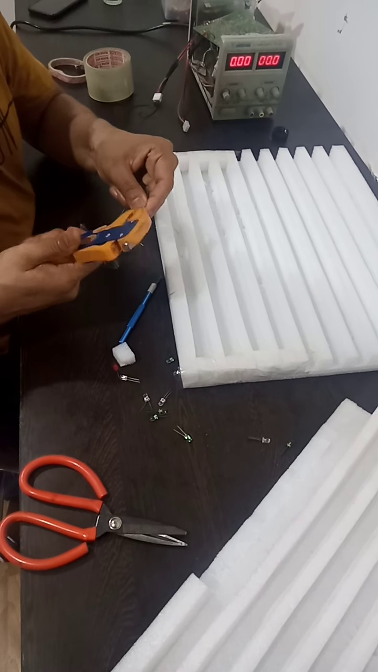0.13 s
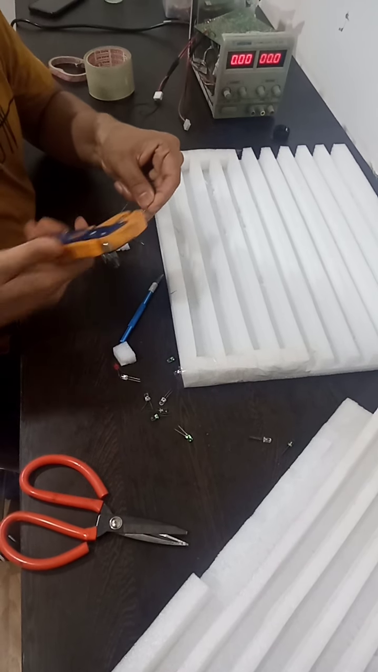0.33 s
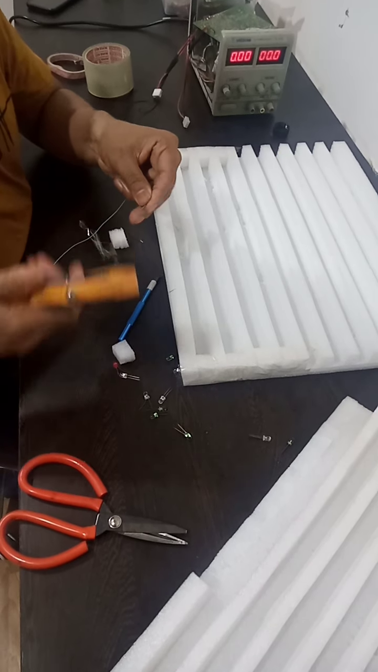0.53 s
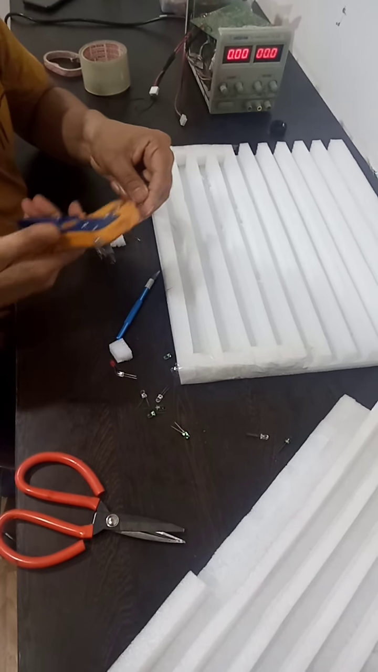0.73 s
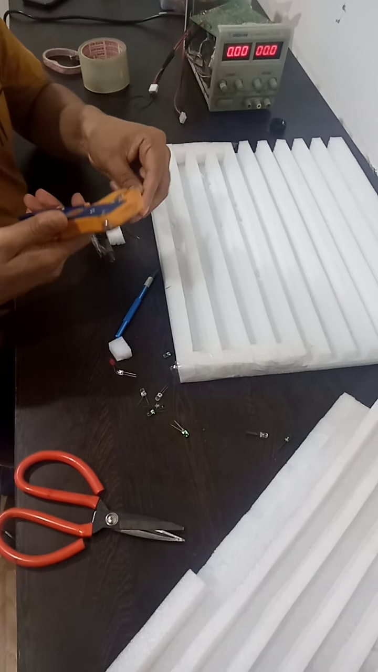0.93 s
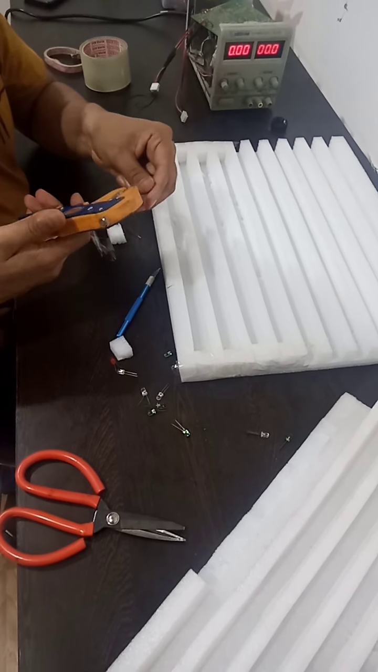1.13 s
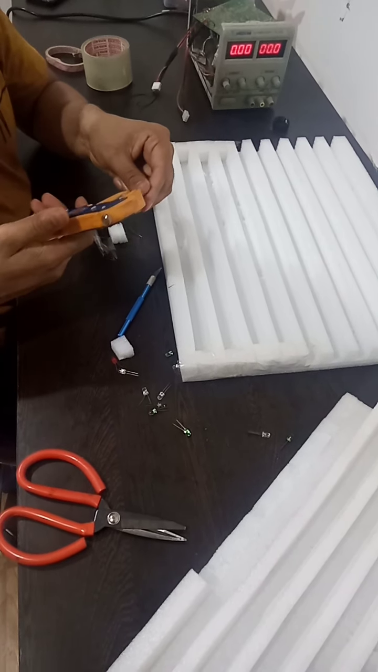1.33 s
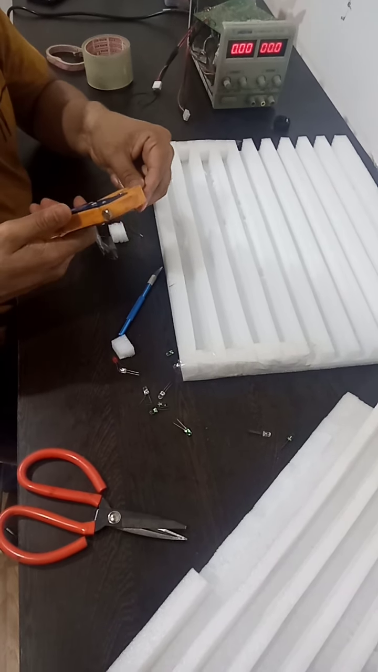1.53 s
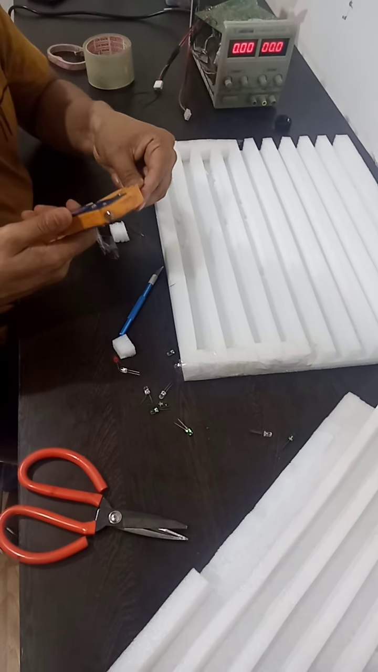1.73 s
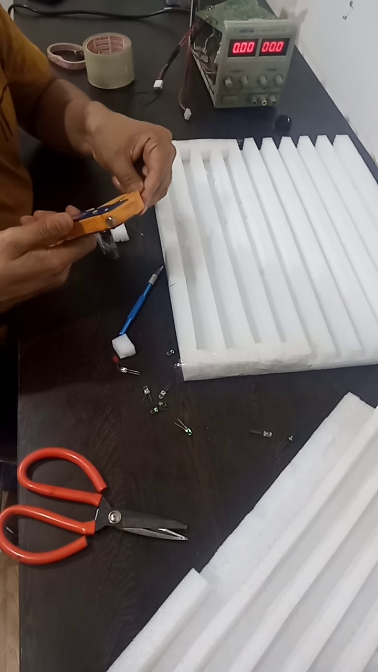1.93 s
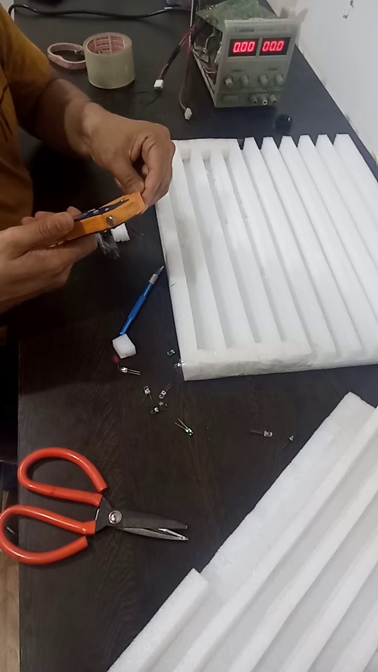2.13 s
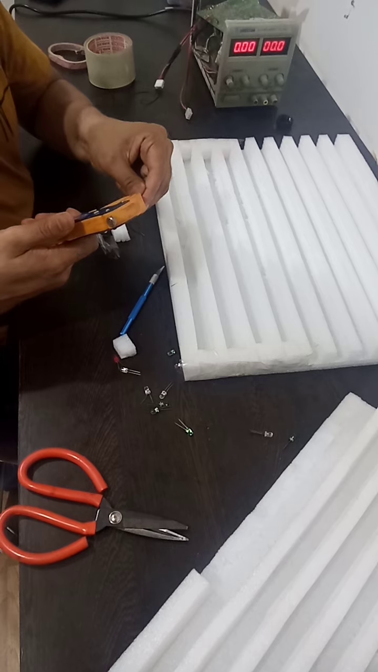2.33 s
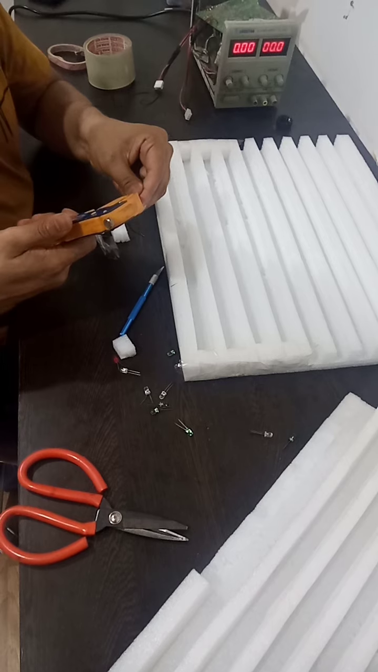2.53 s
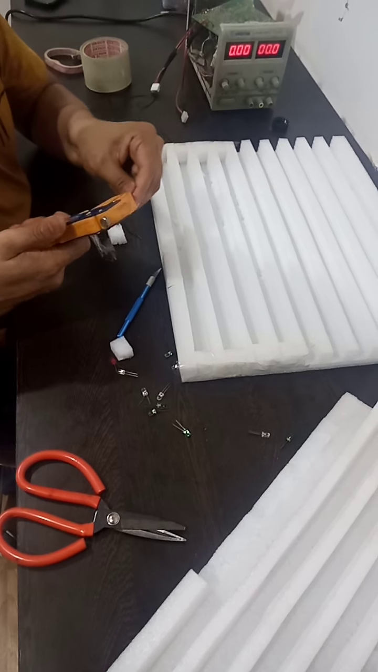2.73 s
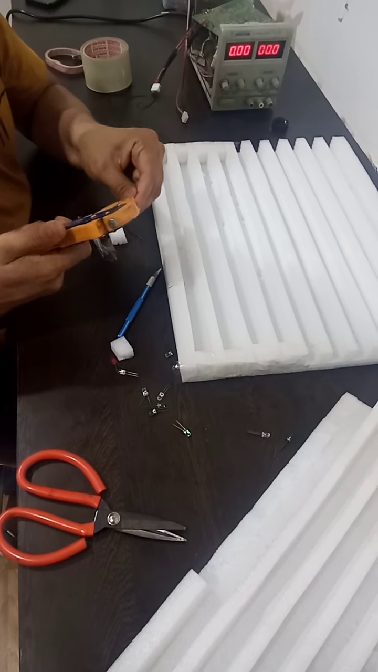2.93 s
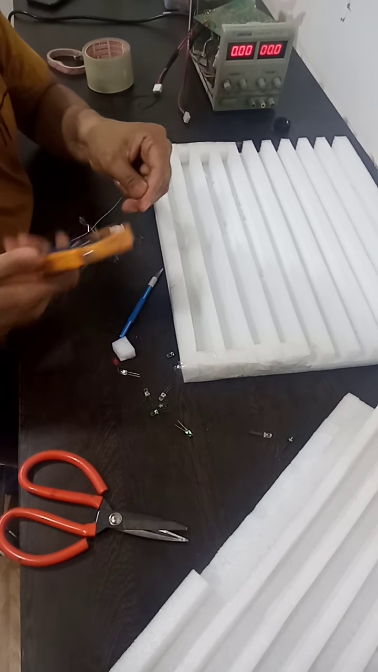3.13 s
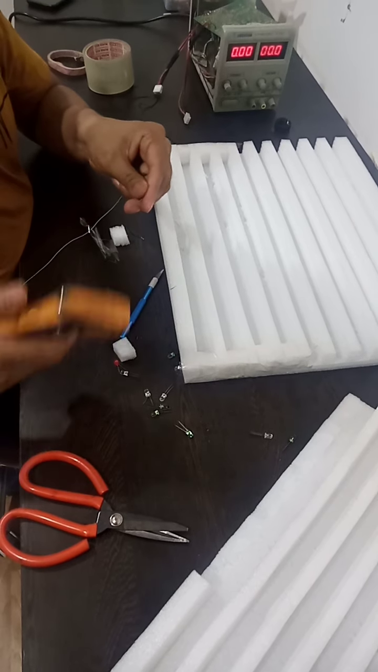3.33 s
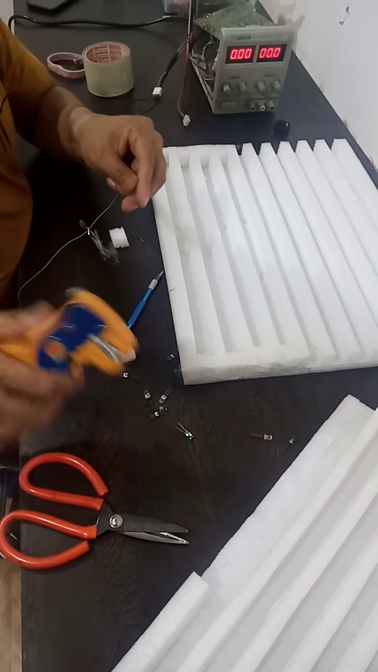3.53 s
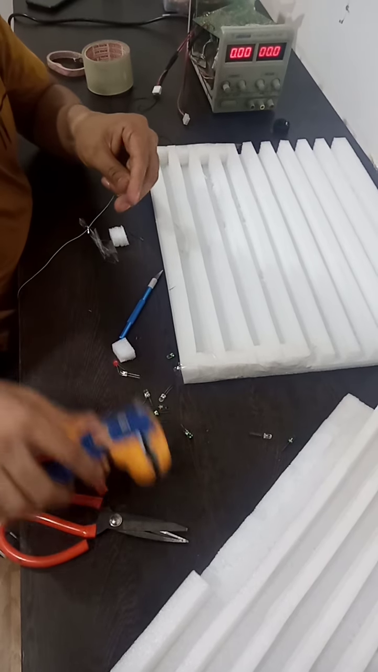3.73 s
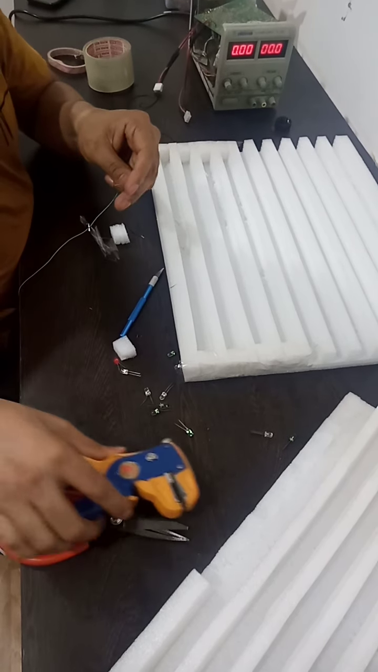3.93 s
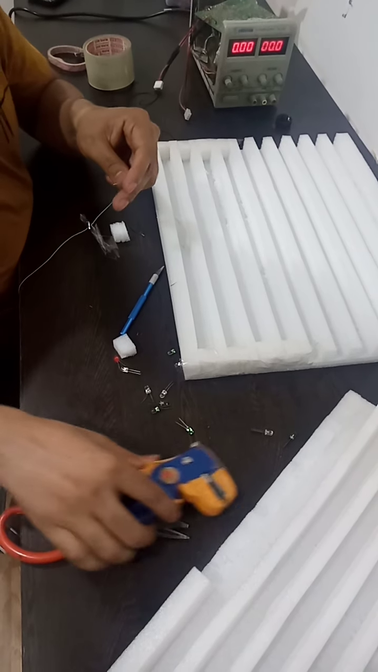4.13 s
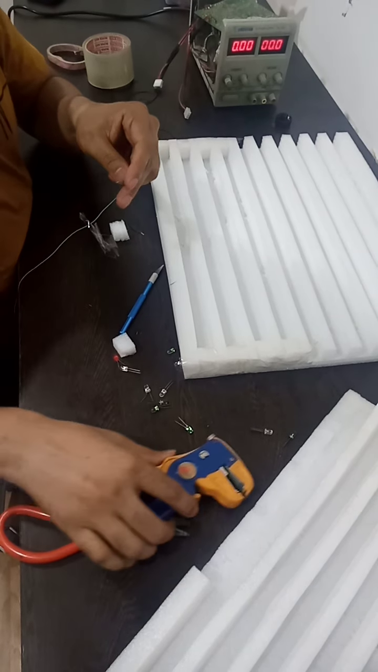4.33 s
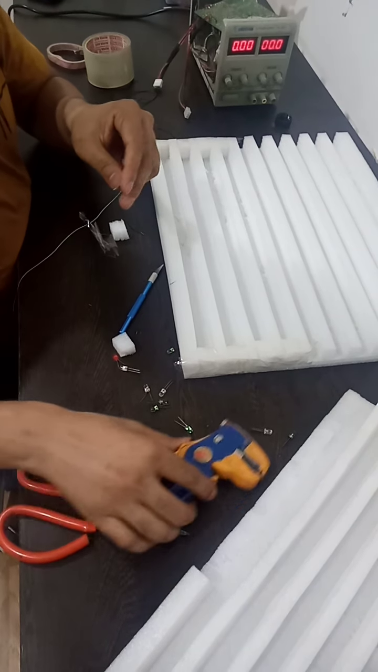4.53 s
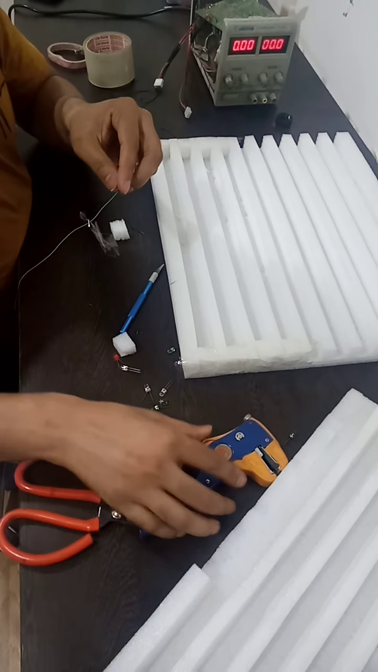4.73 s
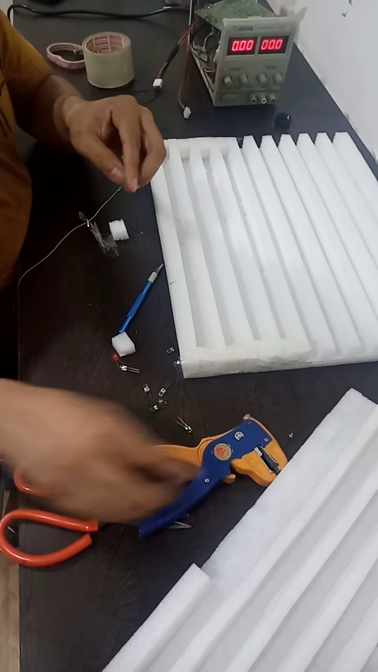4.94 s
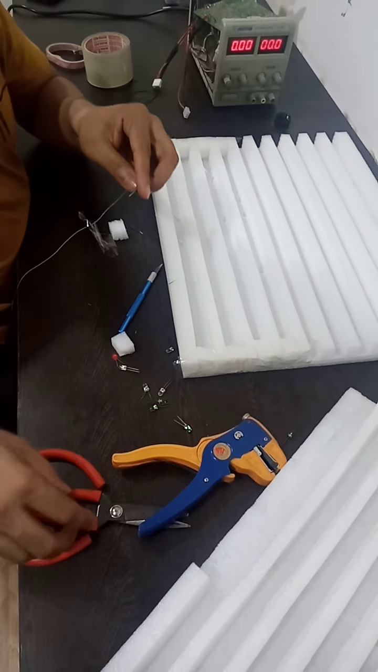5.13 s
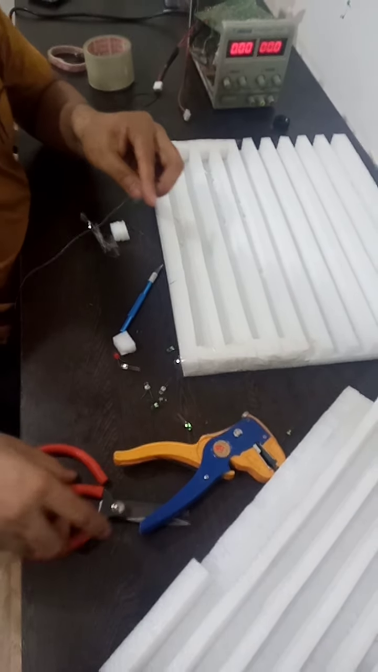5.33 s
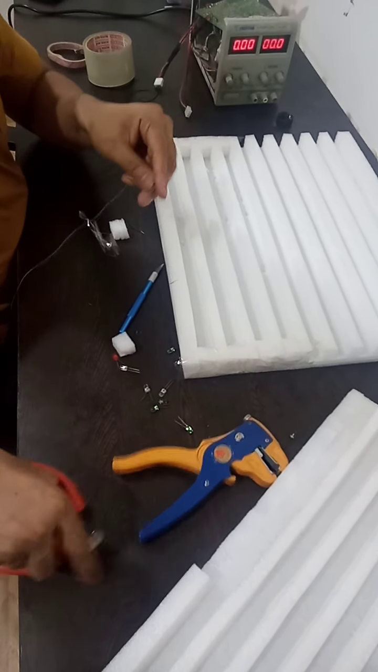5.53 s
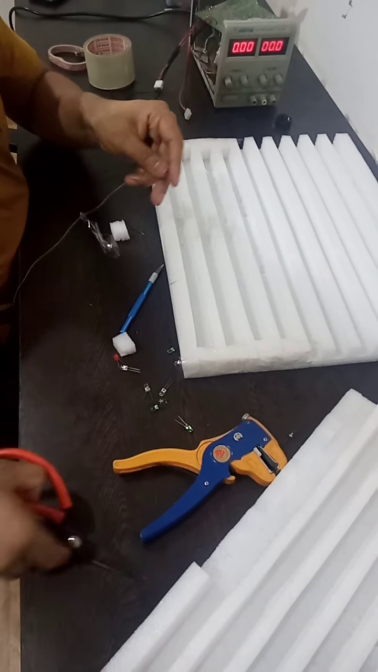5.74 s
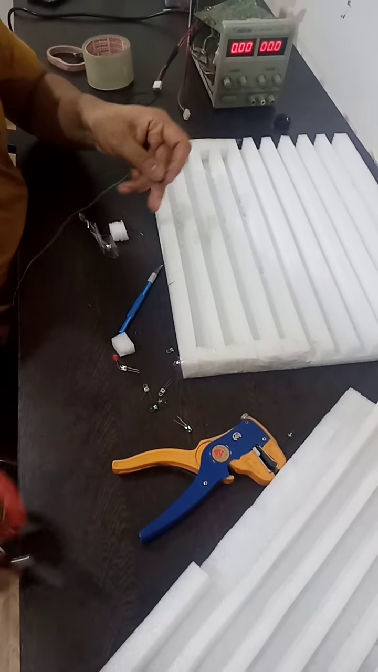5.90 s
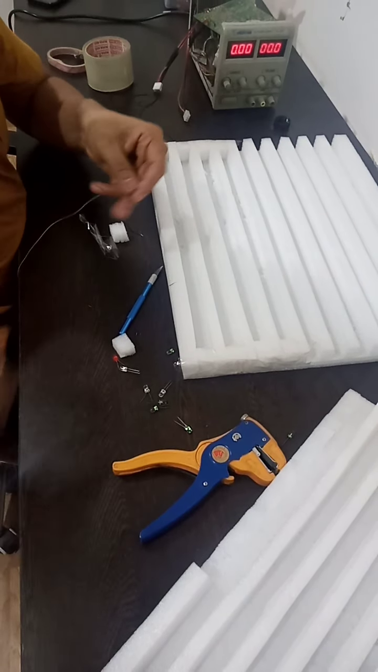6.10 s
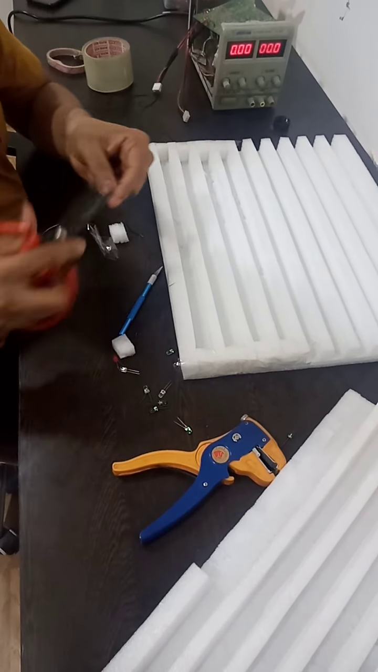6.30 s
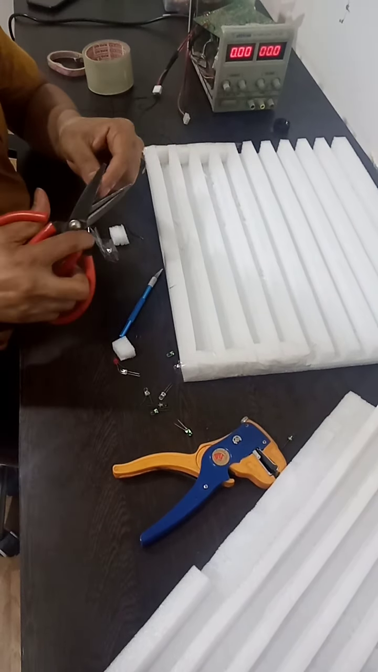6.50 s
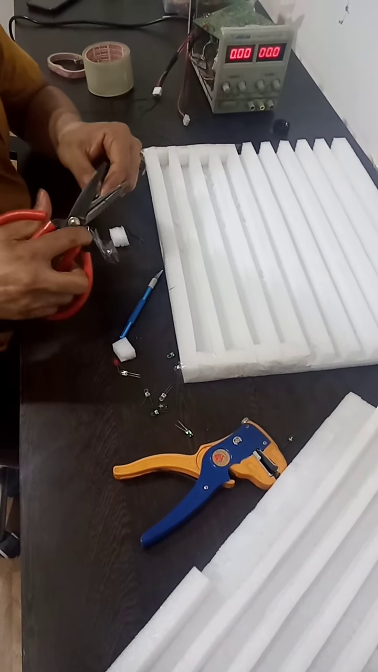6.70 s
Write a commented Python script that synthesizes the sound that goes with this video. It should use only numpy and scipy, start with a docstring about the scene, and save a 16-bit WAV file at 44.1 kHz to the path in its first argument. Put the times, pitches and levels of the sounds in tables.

```python
"""A hand wire stripper snaps twice on a wire and ticks as its jaws close; then tools knock, scrape and clatter on
a wooden tabletop. The place is a hard-walled workshop that answers every blow; a fan hums and whines behind.
Contacts are short pushes through coloured filters, blows ring the modes of the board, sliding is uneven noise,
and the walls add decaying noise tails. The microphone is small and dull, with a faint preamplifier hiss."""
import sys
import numpy as np
from scipy import signal
from scipy.fft import rfft, irfft, next_fast_len
from scipy.io import wavfile
from scipy.ndimage import uniform_filter1d, map_coordinates

SR = 44100
rng = np.random.default_rng(int(sys.argv[2]) if len(sys.argv) > 2 else 0)


def bounce(signal):
    """Save signal as a 16-bit WAV file at the path given by the first command-line argument."""
    frames = np.transpose(np.atleast_2d(signal))
    limited = np.clip(frames, -1, 1)
    pcm = np.round(limited * 32767).astype(np.int16)
    wavfile.write(sys.argv[1], SR, pcm)


N = 302526

# Murmur of the workshop: relative spectrum (frequency [Hz], density [dB per Hz])
MURMUR_SPECTRUM = [(13, -69.5), (24, -28), (65, -5), (99, -5.5), (128, -2), (219, -11.5), (335, -9),
                   (661, -19.5), (1430, -20.5), (2900, -26), (3900, -38), (4600, -52), (5200, -63),
                   (6500, -99)]
# Murmur level: (time [s], level [dB])
MURMUR_LEVEL = [(0, -46.5), (.8, -48), (2, -46.5), (2.3, -49.5), (2.7, -48), (6.86, -46)]
# Low motor tone of the fan: (time [s], level [dB])
HUM_LEVEL = [(0.0, -50.5), (0.4, -49.5), (1.3, -53), (2.16, -49.5), (2.9, -49), (3.65, -56), (4.2, -58),
             (4.85, -68), (5.14, -39), (5.44, -42.5), (5.83, -58), (6.17, -44), (6.4, -65), (6.86, -74)]
# Whine of the fan: (time [s], level [dB])
WHINE_LEVEL = [(0, -55.5), (2.15, -57.5), (2.25, -70), (2.7, -61.5), (3.3, -57), (3.6, -67), (4, -59.5),
               (6.86, -61.5)]
# Noise bands of the whine: (centre [Hz], width [Hz], relative level [dB])
WHINE_BANDS = [(722, 45, 4), (1390, 100, -2.5), (2150, 140, -8)]

# Contacts inside the stripper: (time [s], level [dB], treble relative to that level [dB])
JAW_CONTACTS = [(0.028, -19, -13), (0.032, -15, -20.5), (0.038, -19, -18), (0.0424, -8.5, -18.5),
                (0.204, -21.5, -27), (0.216, -23, -35), (2.779, -29, -14), (2.784, -17, -14),
                (2.7915, -17.5, -35), (3.005, -26, -28), (3.011, -28, -32), (3.018, -26.5, -28),
                (3.492, -44, -2), (6.311, -28.5, -23.5)]
# The blade snaps through, rebounds and closes again:
# (time [s], gap between these pushes [s], snap [dB], rebound [dB], close [dB], chatter [dB], treble [dB])
BLADE_SNAPS = [(.430, .0017, 0.5, -1.5, -8, -7, -16.5), (3.2777, .0018, -3.5, -6.5, -10, -11, -19.5)]
# Relative spectra of jaw contact, blade snap and the treble of every contact: (frequency [Hz], density [dB per Hz])
TICK_SPECTRUM = [(470, -60), (900, -10.5), (1500, -7), (2200, 1.5), (3000, -3), (3900, -0.5), (4720, -20.5),
                 (5500, -33), (7150, -81)]
SNAP_SPECTRUM = [(470, -34), (800, -34), (1600, -29), (2100, -18), (2500, -10.5), (2900, -11), (3300, -7.5),
                 (3800, -16), (4720, -24), (5500, -69), (7150, -80)]
TREBLE_SPECTRUM = [(3200, -5), (5500, -5), (7000, -2.5), (8260, -5), (9600, -15.5), (13500, -17.5),
                   (15800, -14)]
# Reverberation of the hard walls: (frequency [Hz], time to fall 60 dB [s])
WALL_DECAY = [(100, 0.54), (500, 0.94), (2000, 0.84), (4000, .7), (8000, 0.5), (14000, 0.19)]

# Blows on the table:
# (time [s], clack [dB], clack colour [Hz], treble crack [dB], thud [dB], thud colour [Hz])
TABLE_BLOWS = [(4.132, 2.5, 3050, -26, 8.5, 150), (4.145, -0.5, 2920, -60.5, 8.5, 198),
               (4.18, -19, 2000, -69, -2, 110), (4.475, -19, 3000, -47, -27, 300),
               (4.660, -9, 807, -46, 7.5, 650), (4.663, -19, 795, -63, 7.5, 130),
               (4.672, -12, 820, -49, 6, 200), (4.696, 1, 2620, -21, 12, 110),
               (4.708, 6, 1890, -19, 6.5, 600), (4.722, 1, 1790, -45, 10.5, 120),
               (4.747, -5, 1170, -43.5, 3.5, 700), (4.758, -11, 1200, -54, -13, 352),
               (4.811, -5.5, 1500, -32.5, 6, 252), (4.818, -3.5, 910, -46, 6, 660),
               (4.864, -1.5, 1480, -39, -2.5, 650), (5.105, -41, 1500, -80, -1.5, 105),
               (5.288, -21, 3000, -62, -36, 200), (5.355, -25, 3000, -41.5, -12.5, 130),
               (5.368, -6, 2500, -29, -7, 200), (5.416, -19.5, 2200, -46, -4, 130),
               (5.465, -22, 2200, -52, -3, 120), (5.5751, 6.5, 2120, -21, 15, 423),
               (5.580, 8.5, 2550, -34, 11.5, 400), (5.597, 6.5, 2450, -38, 10, 130),
               (5.626, -6.5, 2200, -48.5, 0.5, 125), (5.685, -8, 2200, -55.5, 4, 300),
               (5.775, -19, 2000, -69, -0.5, 400), (5.869, -38, 1500, -70, 0, 185),
               (5.95, -28, 1498, -70, -6.5, 297)]
# Clack of a tool before its colour is applied: relative spectrum (frequency [Hz], density [dB per Hz])
CLACK_SPECTRUM = [(300, -31.5), (700, -4.5), (1400, 2.5), (2200, 0), (3200, -4), (3900, -8.5), (4700, -18),
                  (5400, -33.5), (7000, -90)]
# Modes of the tabletop: (frequency [Hz], relative level [dB], time to fall 60 dB when held = 1 [s])
BOARD_MODES = [(73.6, -27, 0.21), (104.5, -5, 0.39), (129.85, 3.5, 0.37), (159, -7, 0.29), (183.8, -8.5, 1),
               (202.8, -4.5, 0.3), (321, -23, 0.28), (322.5, -4.5, 0.078), (346.7, 9, 0.058),
               (400, -2.5, 0.024), (430.7, 3, 0.051), (506.3, 2, 0.076), (567, -9.5, 0.14),
               (663, -1.5, 0.062), (724, -2.5, 0.051), (850, -4, 0.041)]

# Strokes over the table, one list for the stripper, then one for the scissors:
# (start [s], length [s], rasp [dB], rumble of the board [dB], rattle of the board [dB])
TOOL_STROKES = [
    [(4.15, .27, -50.5, -44, -40.5), (4.42, .21, -38.5, -37, -38), (4.68, 0.066, -29.5, -52, -39.5),
     (4.77, 0.13, -36.5, -41.5, -32), (5.08, 0.085, -59, -42, -48)],
    [(5.33, 0.054, -37.5, -31, -30), (5.45, 0.13, -26.5, -32.5, -43), (5.58, .12, -37.5, -56, -45),
     (5.8, 0.25, -61, -45.5, -50.5)],
]
# Relative spectra of the sliding stripper and the sliding scissors: (frequency [Hz], density [dB per Hz])
STRIPPER_SLIDE_SPECTRUM = [(410, -18), (700, 2.5), (1000, 1), (1400, 1), (2000, -11.5), (2400, -7),
                           (3200, -14.5), (4000, -19.5), (5500, -47), (7150, -85.5)]
SCISSORS_SLIDE_SPECTRUM = [(410, -47), (700, -15), (1020, -5.5), (1420, -8.5), (1600, -9), (2200, 1.5),
                           (2450, -4.5), (2700, -4), (3100, -9.5), (4000, -19), (5500, -45), (7150, -68),
                           (12100, -120)]

HUM_HZ = 71.8
JAW_CHATTER_S, BLOW_CHATTER_S = 0.0046, 0.007  # time for the chatter to fall 10 dB
STROKE_RISE, STROKE_FADE_DB_PER_S = 0.53, 171  # the rise is a share of the stroke's length
TOP_HZ = 15750  # band limit of the microphone chain


def amp(db):
    """Amplitude ratio of a level in dB."""
    return 10 ** (np.asarray(db) / 20)


def unit(x):
    """x scaled to an rms of 1."""
    return x / np.sqrt(np.mean(x ** 2) + 1e-20)


def along(points, hz):
    """Values of (Hz, value) points, interpolated on a log frequency axis."""
    f, v = np.transpose(points)
    return np.interp(np.log(hz + 1), np.log(f + 1), v)


def weight(hz, centre_hz, octaves):
    """Gain of a broad hump on a log axis: where and how hard a blow lands sets its colour."""
    return np.exp(-.5 * (np.log2(hz / centre_hz) / octaves) ** 2)


def curves(rows):
    """One gain per sample for each dB column, silent outside the rows."""
    s, *cols = np.transpose(rows)
    t = np.arange(N) / SR
    return [amp(np.interp(t, s, c, -200, -200)) for c in cols]


def wobble(rate):
    """A smooth random curve, rate knots a second."""
    knots = rng.standard_normal(int(N * rate / SR) + 4)
    return map_coordinates(knots, [np.arange(N) * rate / SR])


def filtered(x, response):
    """x with its spectrum multiplied by a response of frequency."""
    m = next_fast_len(N + SR // 2)
    return irfft(rfft(x, m) * response(np.fft.rfftfreq(m, 1 / SR)), m)[:N]


def coloured(x, spectrum, size=2048):
    """x through a causal, minimum-phase filter of energy 1 that has this spectrum."""
    closed = list(spectrum) + [(spectrum[-1][0] * 1.25, -90)]  # close the band above the last point
    magnitude = amp(along(closed, np.fft.rfftfreq(size, 1 / SR)))
    cepstrum = irfft(np.log(magnitude + 1e-5))
    cepstrum[1:size // 2] *= 2  # folding the cepstrum forward puts the energy first
    cepstrum[size // 2 + 1:] = 0
    h = irfft(np.exp(rfft(cepstrum)))
    return signal.fftconvolve(x, h / np.linalg.norm(h))[:N]


def contacts(times, dbs, lengths):
    """One sharp push for each contact, with a chatter dying behind it; dB sets the energy."""
    out, t = np.zeros(N + SR), np.arange(SR // 10) / SR
    for s, db, length in zip(times, dbs, lengths):
        burst = rng.standard_normal(len(t)) * amp(-10 * (t / max(length, 1e-4)) ** 2)
        burst[0] = 3  # the push itself
        out[round(s * SR):][:len(t)] += amp(db) * burst / np.linalg.norm(burst)
    return out[:N]


def push(x):
    """The energy of a short chatter in its first sample: its pattern differs by direction, walls hear the average."""
    out = np.zeros(len(x))
    out[np.argmax(x != 0)] = np.linalg.norm(x)
    return out


def murmur():
    """Far machines: noise whose strength is patchy in time and frequency."""
    z = signal.stft(rng.standard_normal(N), nperseg=1024)[2]
    field = uniform_filter1d(rng.standard_normal(z.shape), size=6, axis=0)  # smooth over frequency
    field = uniform_filter1d(field, size=8, axis=1)  # smooth over time
    patchy = signal.istft(z * amp(2.14 * unit(field)), nperseg=1024)[1][:N]
    tinted = filtered(patchy, lambda hz: amp(along(MURMUR_SPECTRUM, hz)))
    return curves(MURMUR_LEVEL)[0] * unit(tinted)


def hum():
    """A low motor tone whose pitch and strength waver a little."""
    hz = HUM_HZ + 1.59 * wobble(3.6)
    return np.sqrt(2) * amp(0.5 * wobble(2.9)) * np.sin(2 * np.pi * np.cumsum(hz) / SR)


def narrow(bands):
    """Noise in narrow bands: an unsteady tone."""
    def shape(f):
        return sum(amp(db) / (1 + (2 * (f - hz) / width) ** 2) for hz, width, db in bands)
    return unit(filtered(rng.standard_normal(N), shape))


def whine():
    """Narrow noise bands with a steadier tone inside the lowest one."""
    core_hz = WHINE_BANDS[0][0] + 4 * wobble(6)
    core = np.sin(2 * np.pi * np.cumsum(core_hz) / SR)
    return narrow(WHINE_BANDS) + amp(-2.5) * core


def background():
    """The murmur of far machines with the hum and whine of the fan."""
    return murmur() + curves(HUM_LEVEL)[0] * hum() + curves(WHINE_LEVEL)[0] * whine()


def stripper():
    """Jaws and spring click in the plastic body; a rebound pushes the other way. Rows: direct, for the walls."""
    s, db, treble_db = np.transpose(JAW_CONTACTS)
    length = np.full(len(s), JAW_CHATTER_S)
    ticks = coloured(contacts(s, db, length), TICK_SPECTRUM)
    ticks += coloured(contacts(s, db + treble_db, length), TREBLE_SPECTRUM)
    out = np.tile(ticks, (2, 1))
    for s, gap, *push_dbs, chatter_db, treble_db in BLADE_SNAPS:
        snap = contacts([s], [chatter_db], [.004])
        treble = contacts([s], [treble_db], [.003])
        for k, db in enumerate(push_dbs):
            snap[round((s + k * gap) * SR)] += (-1) ** k * amp(db)
        direct = coloured(snap, SNAP_SPECTRUM) + coloured(treble, TREBLE_SPECTRUM)
        for_walls = coloured(push(snap), SNAP_SPECTRUM) + coloured(push(treble), TREBLE_SPECTRUM)
        out += [direct, for_walls]
    return out


def workshop(x, size=8192):
    """Each frequency dies at its own speed; every moment gets a tail of its own, as the tools move about."""
    out, x = np.zeros(N + 3 * SR), np.pad(x, size)
    for k in range(0, N + size, size // 2):
        piece = x[k:k + size] * np.hanning(size + 1)[:-1]  # overlapping pieces add up to x
        if np.abs(piece).max() > 1e-5:  # skip near-silent pieces
            hz, t, z = signal.stft(rng.standard_normal(3 * SR // 4), SR, nperseg=256)
            decay = amp(-60 * t / along(WALL_DECAY, hz)[:, None])
            tail = signal.istft(z * decay, SR, nperseg=256)[1]
            wet = signal.fftconvolve(piece, tail / np.linalg.norm(tail))
            out[k + 200:][:len(wet)] += wet  # samples: the first wall is a few ms away
    return out[size:size + N]


def board(centre_hz, held=0.83):
    """The tabletop's ring, energy 1, strongest in modes near centre_hz; a hand pressing on it (held) damps it."""
    t = np.arange(SR) / SR
    scatter_db = rng.normal(0, 2.25, len(BOARD_MODES))  # each contact excites the modes a little differently
    h = np.zeros(SR)
    for (hz, db, t60), own_db in zip(BOARD_MODES, scatter_db):
        envelope = amp(db + own_db - 60 * held * t / t60)
        h += weight(hz, centre_hz, 0.71) * envelope * np.sin(2 * np.pi * hz * t)
    h *= 1 - np.exp(-t / 0.00089)  # the contact is not instant
    return h / np.linalg.norm(h)


def knocks():
    """Each blow clacks on the tool, cracks in the treble and thuds in the board. Rows as for the stripper."""
    out = np.zeros((2, N + SR))
    for s, db, clack_hz, treble_db, thud_db, thud_hz in TABLE_BLOWS:
        colour = [(hz, level + 20 * np.log10(0.84 + weight(hz, clack_hz, 0.24))) for hz, level in CLACK_SPECTRUM]
        clack = contacts([0], [db], [BLOW_CHATTER_S])[:SR // 10]
        crack = contacts([0], [treble_db], [.005])[:SR // 10]
        direct = coloured(clack, colour) + coloured(crack, TREBLE_SPECTRUM)
        for_walls = coloured(push(clack), colour) + coloured(push(crack), TREBLE_SPECTRUM)
        from_blow = out[:, round(s * SR):]  # a view into out
        from_blow[:, :len(direct)] += np.array([direct, for_walls])
        from_blow[:, :SR] += amp(thud_db) * board(thud_hz)
    return out[:, :N]


def strokes(rows):
    """One gain per sample for each dB column: every stroke rises, holds and fades alike."""
    t, out = np.arange(N) / SR, 0
    for s, length, *dbs in rows:
        rise = np.clip((t - s) / (STROKE_RISE * length), 0, 1) ** 2
        fade = amp(-STROKE_FADE_DB_PER_S * np.clip(t - s - length, 0, None))
        out = out + amp(dbs)[:, None] * rise * fade
    return out


def tabletop(x, centre_hz, held):
    """x shakes the modes of the board."""
    return signal.fftconvolve(x, board(centre_hz, held))[:N]


def slide(rows, spectrum, bumps_db, treble_db, rattle_hz):
    """Uneven friction noise of one tool, heard in the tool itself and in the board."""
    bumps = bumps_db * wobble(45)  # one catch of the surface is heard in every band

    def grip():
        return unit(amp(bumps + 2.3 * wobble(400)) * rng.standard_normal(N))

    rasp, rumble, rattle = strokes(rows)
    out = coloured(rasp * grip(), spectrum)
    out += coloured(amp(treble_db) * rasp * grip(), TREBLE_SPECTRUM)
    out += tabletop(rumble * grip(), centre_hz=120, held=0.55)
    out += tabletop(rattle * grip(), centre_hz=rattle_hz, held=2.6)
    return out


def drags():
    """The stripper and the scissors slide over the table by friction."""
    stripper_rows, scissors_rows = TOOL_STROKES
    return (slide(stripper_rows, STRIPPER_SLIDE_SPECTRUM, bumps_db=5, treble_db=-46, rattle_hz=600)
            + slide(scissors_rows, SCISSORS_SLIDE_SPECTRUM, bumps_db=3, treble_db=-41, rattle_hz=420))


def scene():
    """Direct sound of the tools, the answer of the walls, and the background."""
    snips, snips_for_walls = stripper()
    blows, blows_for_walls = knocks()
    slides = drags()
    wet = workshop(amp(-4.5) * snips_for_walls + amp(-2.5) * blows_for_walls + amp(2.0) * slides)
    no_deep_bass = signal.butter(4, 58, "high", fs=SR, output="sos")  # the tools and the walls' answer are cut below about 58 Hz
    tools = signal.sosfilt(no_deep_bass, snips + blows + slides + wet)
    return (tools + background())[None]


def record(dry):
    """The preamplifier hisses faintly; nothing is kept above the band limit."""
    hiss = amp(-85.5) * rng.standard_normal(N)
    return filtered(dry[0] + hiss, lambda hz: hz < TOP_HZ)[None]


dry = scene()
out = record(dry)
bounce(out)
```